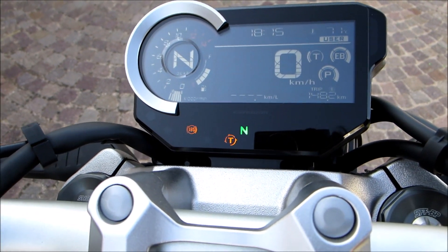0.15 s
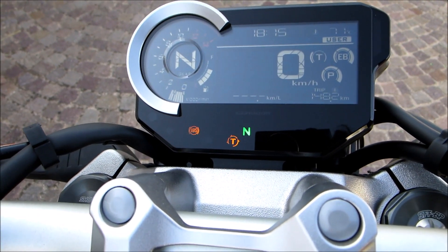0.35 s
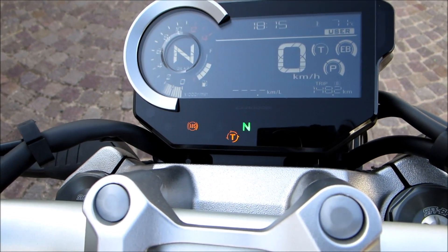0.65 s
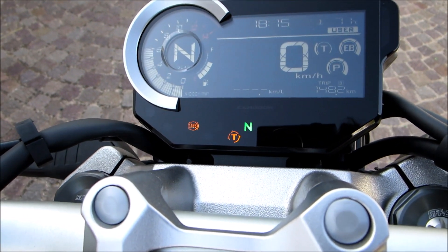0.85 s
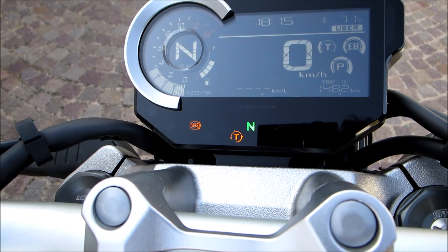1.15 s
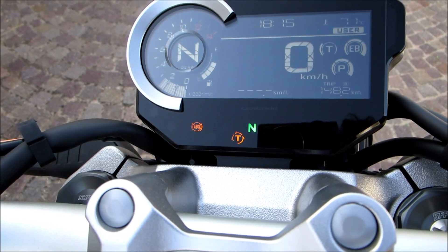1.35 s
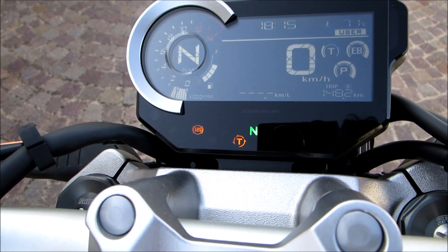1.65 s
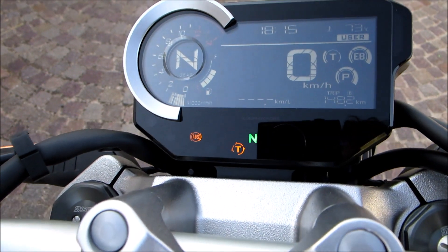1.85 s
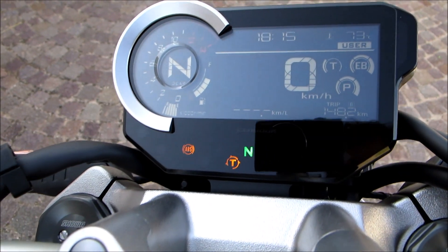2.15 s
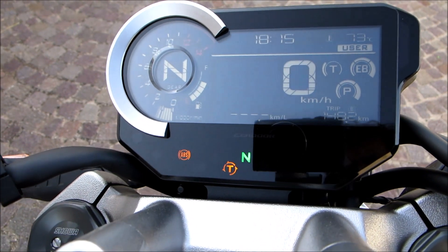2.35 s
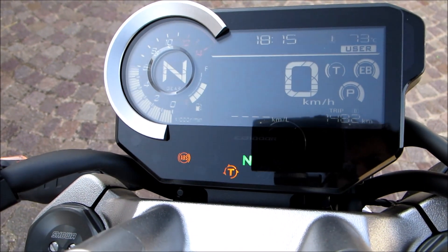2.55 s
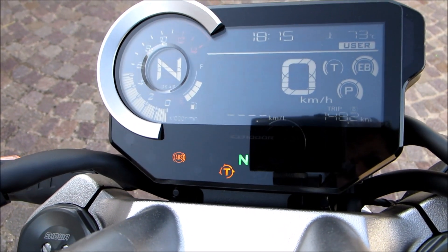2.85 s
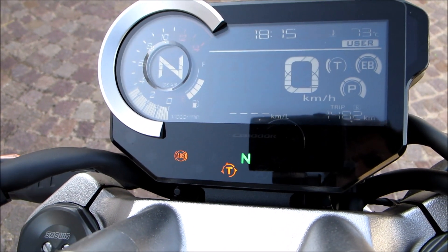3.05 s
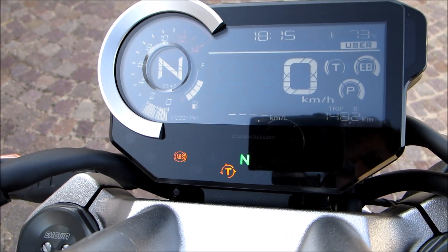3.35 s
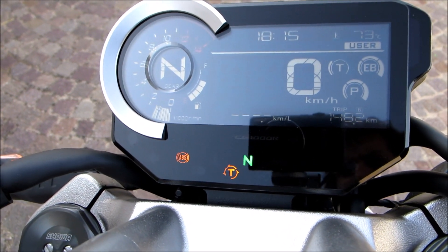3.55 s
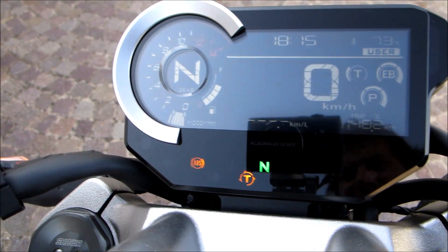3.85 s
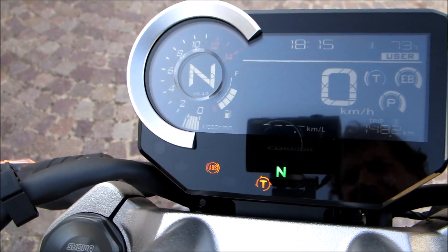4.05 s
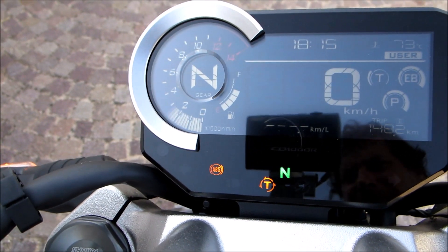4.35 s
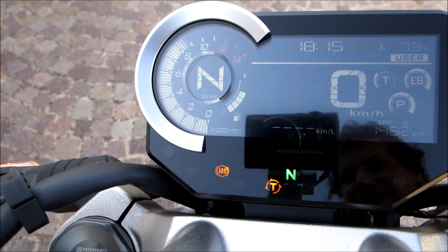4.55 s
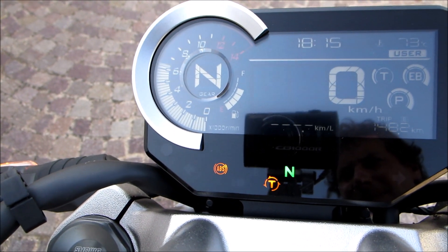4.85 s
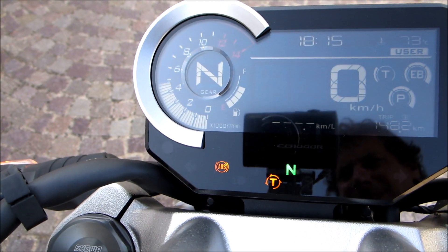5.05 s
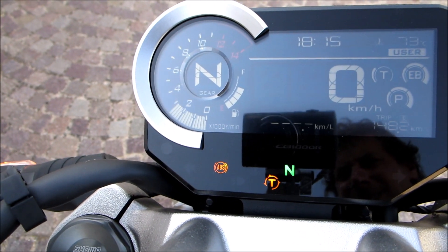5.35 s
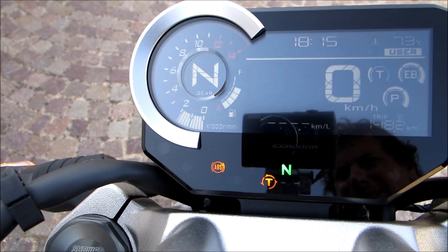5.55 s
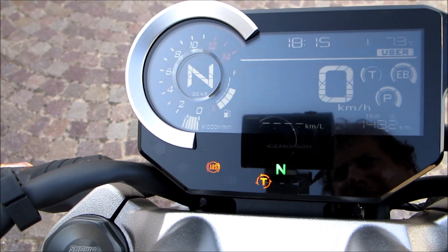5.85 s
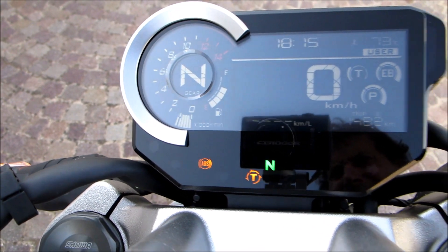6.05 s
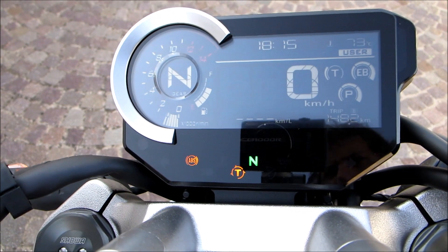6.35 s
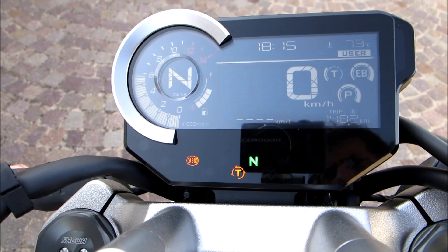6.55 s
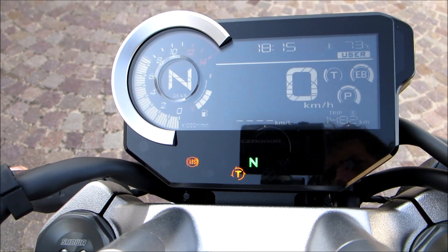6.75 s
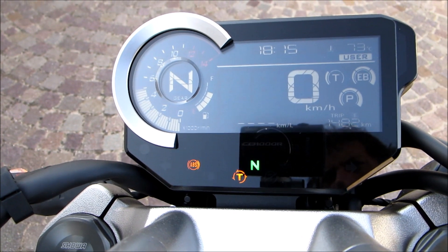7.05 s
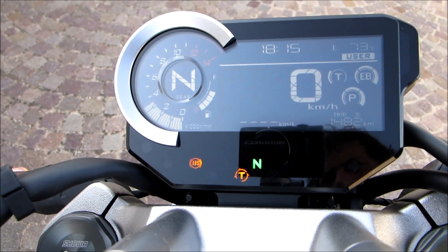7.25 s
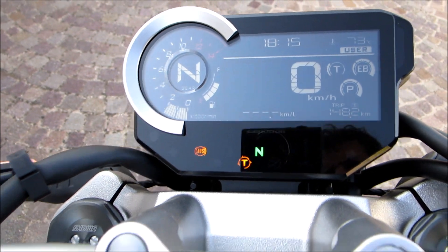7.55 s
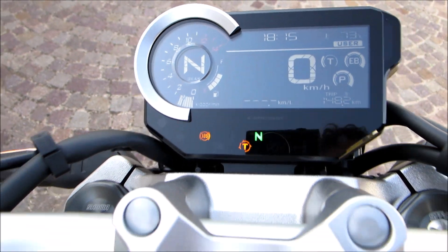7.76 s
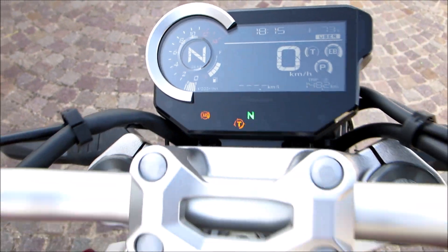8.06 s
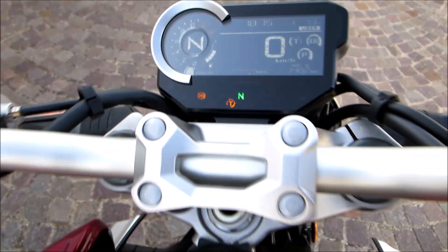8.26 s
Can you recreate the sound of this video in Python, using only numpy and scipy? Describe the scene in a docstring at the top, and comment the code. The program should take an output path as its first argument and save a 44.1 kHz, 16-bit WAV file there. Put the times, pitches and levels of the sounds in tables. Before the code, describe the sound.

Close motorcycle engine at idle outdoors, four throttle blips that snarl upward quickly, then slide down as a clean tone into lumpy idle.

```python
"""A four-cylinder motorcycle idles on open paving, heard from above the handlebar.
Exhaust pulses first ring the silencer, with a few weak firings. Then come four blips: each time the revs climb
and the exhaust barks, and on the way down the fuel is cut and a clean falling tone, the engine's pumping, sings
over valve and chain hiss. After each fall the firing catches unevenly and the engine settles back to idle.
Pulses, noise and sine waves follow one running count of firings; single cracks and thumps are added on top."""
import sys
import numpy as np
from scipy import signal
from scipy.io import wavfile
from scipy.ndimage import uniform_filter1d

SR = 44100
rng = np.random.default_rng(int(sys.argv[2]) if len(sys.argv) > 2 else 0)


def log_audio(samples):
    """Write samples as a 16-bit WAV file to the path given in sys.argv[1]."""
    # one column per channel
    frames = np.atleast_2d(samples).T
    # limit to full scale, then quantise
    limited = np.clip(frames, -1, 1)
    pcm = np.round(limited * 32767).astype(np.int16)
    wavfile.write(sys.argv[1], SR, pcm)


N = 369999  # samples

# One row a blip, when the revs climb and fall through PASSING_HZ: climb_s, fall_s
BLIPS = [(0.689, 1.276), (2.458, 3.16), (4.375, 5.321), (6.473, 7.326)]
# Brief dips from weak firings: time_s, depth_db, width_s
WEAK_FIRINGS = [(0.244, 14, 0.015), (4.01, 5, 0.013), (4.092, 10, 0.022), (4.139, 12, 0.018),
                (5.618, 0, 0.016), (5.784, 18, 0.027), (6.081, 10, 0.018), (7.726, 5.5, 0.039),
                (8.067, 10, 0.017), (8.19, 12, 0.028)]
# Hard firings that crack: start_s, level_db
CRACKS = [(0.149, -11), (0.594, -22), (0.618, -7.5), (0.649, -26), (0.672, -17), (2.417, 1), (4.236, -35),
          (5.798, -21), (6.451, -23), (6.489, -1)]
# Unburnt charge lighting in the silencer: start_s, level_db
THUMPS = [(2.55, -24), (4.635, -10), (6.705, -11)]
# Overall level, which sags and partly recovers: time_s, level_db
LEVEL = [(0, 1), (.2, -0.1), (.55, -1.7), (.85, -8.5), (1.2, -7), (1.6, -9), (2.3, -6), (2.65, -9.5),
         (3.1, -9.5), (3.6, -11), (4.2, -7.5), (4.6, -7), (5.2, -11.5), (5.7, -12), (6.3, -10), (6.7, -7),
         (7.25, -11.5), (7.8, -12), (8.39, -10.5)]
# Levels at a closed throttle, before LEVEL: firing_hz, tone_db, bark_db, hiss_db
COASTING = [(36.7, -38, -23.5, -37.5), (46, -31, -22.5, -34.5), (58, -22.5, -21, -35),
            (71.4, -13.5, -18.5, -34.5), (90, -6, -15, -30.5), (106, -1.5, -14.5, -27.5),
            (127.5, -1, -12, -25), (148, -8.5, -13, -24), (158, -13, -11.5, -21.5),
            (180, -11, -11.5, -23.5), (203, -6, -12.5, -21.5), (208, -6, -12.5, -22.5), (264, -8, -11, -17),
            (302, -10, -12, -18)]
# What full load adds: firing_hz, tone_db, bark_db, hiss_db, boom_db
LOADED = [(47, .1, 2, 1.5, 4), (66, 4.5, 8, 8.5, 5), (82, -1, 7.5, 5, 22), (110, 1.5, 6.5, 1.5, 6),
          (135, -2, 3.5, -4.5, 8), (161, -15, 1, -3, 18), (193, -0.5, 4.5, 1.7, 6), (230, 2.5, 2, -3, 20),
          (263, 1, -0.2, -4.2, 6)]
# Pulse strength of each cylinder in firing order: level_db
CYLINDERS_DB = [0., -1.5, .8, -2.]
# Colour of the bark at idle: pitch_hz, gain_db
BARK_IDLE = [(120, -17.5), (210, -4.5), (290, -6), (440, -1.5), (560, -9.5), (640, -2.5), (800, -6),
             (1000, -3), (1280, -14), (1490, -14), (2500, -29.5), (3200, -46), (5200, -45), (8800, -100)]
# Colour of the bark with the throttle open: pitch_hz, gain_db
BARK_OPEN = [(120, -22), (200, -2), (347, -2.5), (446, -11), (512, -3), (727, -3.5), (794, 6), (911, -1.5),
             (1290, -17.5), (1680, -21), (4000, -25), (5200, -61), (8800, -120)]
# Colour of the bark with the throttle shut: pitch_hz, gain_db
BARK_SHUT = [(190, -46.5), (330, -5.5), (411, -11.5), (545, -5), (637, -16.5), (700, 2.5), (908, 5.5),
             (1340, -3), (1700, -8.5), (3250, -34), (4000, -14.5), (5200, -68), (8800, -120)]
# Frame and pipe resonances, against the bark: pitch_hz, width_hz (of one filter pass), level_db
RINGS = [(224.2, 35, -17), (896, 19, -13.5), (1694, 86, -15), (2567, 390, -22)]
# Bark that differs between the microphones, against the shared bark: pitch_hz, gain_db
SPREAD = [(200, -43), (380, -15.5), (700, -18), (1290, -14), (2380, -20), (4400, -1)]
# Colour of the silencer's boom: pitch_hz, gain_db
SILENCER = [(20, -54), (37, -16), (74, -7), (100, 11.5), (112, 7.5), (128, 5.5), (150, -10.5), (185, -18),
            (230, -39), (320, -21), (600, -51), (2500, -100)]
# Colour the silencer gives the slow orders while revving: pitch_hz, gain_db
SILENCER_REVVING = [(30, -26), (70, -21), (105, 6), (130, -2.5), (160, -16), (230, -7)]
# Slow beats from unequal cylinders, before SILENCER_REVVING: multiple (of the firing rate), level_db
SLOW_ORDERS = [(.25, -35), (.5, -29.5), (.75, -35.5)]
# Rasp tones, before OUTLET and the rise with revs: multiple (of the firing rate), level_db
RASP_ORDERS = [(1.5, -15), (2, -3.5), (2.5, -12.5), (3, -5.5), (3.5, -10.5), (4, -7.5), (4.5, -10),
               (5, -9.5), (5.5, -10), (6, -19.5), (6.5, -10.5), (7, -10.5), (7.5, -11), (8, -19.5),
               (9, -8.5), (10, -26)]
# Colour the outlet gives the rasp: pitch_hz, gain_db
OUTLET = [(100, -5), (150, 9), (200, -7), (280, 0), (340, -4), (390, -6.5), (440, -6.5), (490, -7),
          (550, 1), (620, -2), (710, -0.5), (800, -6.5), (900, 0), (1050, 0), (1300, -10.5), (1700, -5.5),
          (2600, -50)]
# How each rasp tone wavers: level_db, rate_hz, phase_turns (grows with the root of the multiple)
RASP_WAVER = 4.2, 16., .04
# Rasp of the coasting engine, against the bark: pitch_hz, width_hz (of one filter pass), level_db
SIZZLE = 2650, 1100, -18.5
# Colour of valve and chain hiss: pitch_hz, gain_db
HISS = [(1120, -24), (1900, 0.5), (2410, -2), (3250, -8.5), (5700, -10.5), (13000, -23.5), (14600, -25.5),
        (15500, -34)]
# Extra colour of the hiss that both microphones hear alike: pitch_hz, gain_db
SHARED_HISS = [(1500, 5.5), (2600, -7), (3600, -6), (5000, -11), (9000, -4.5), (14000, -1)]

# Speeds are in firings a second
IDLE_HZ, HUNT_HZ, HUNTS_PER_S = 36.9, 1.2, 2.5  # idle speed, how far it hunts and how quickly
PASSING_HZ = 100
CLIMB_PER_S = 6.9  # under throttle the revs grow exponentially
DRAG_PER_S, FRICTION_HZ = .685, 207.2  # coasting loses DRAG x (revs + FRICTION) each second
CREST, SETTLE = 7.2, 8.5  # sharpness of the turn at the top and of the landing at idle
THROTTLE_FROM_HZ = 35  # load adds nothing at or below this speed
MERGE_HZ, RELIGHT_HZ = 80.3, 70  # pulses merge into a tone above the first; fuel returns below the second
THROTTLE_EDGE_S = .1
BOOM_DB, BOOM_FADE_DB = -11, 25  # boom before LEVEL and load, and its drop while revving
OVERRUN_HUSH_DB = 3.5  # less turbulence without combustion
RASP_DB_PER_OCTAVE = 5.5
SCATTER_DB, KNOCK_DB = 1.5, -7.5  # chance in firing strength; header knock against the bark
LEFT_LAG, EDGE_HZ = 3, 15350  # extra samples to the left microphone; top of the sound band


def bark(train, turns, opened, shut):
    """Pulses and turbulent gas shake the pipe, whose colour follows the throttle."""
    # The gas noise is strongest just after each firing
    puff = (3.7 + np.exp(-(turns % 1) / 1.0)) * rng.standard_normal(N)
    swell = uniform_filter1d(train, 600, origin=299)  # a strong firing blows a strong puff
    gas = evened(puff * (swell + 2.8 * swell.mean()), 0.12)
    # Baffles smear each pulse
    echoes = rng.standard_normal(900) * gain_of(-60 * np.arange(900) / SR / 0.026)
    smeared = evened(signal.oaconvolve(train, echoes)[:N], 0.05)
    rough = np.clip(.75 - 0.096 * opened - 0.034 * shut, 0, 1)
    drive = (1 - rough) * smeared + rough * gas

    out = np.zeros(N)
    shares = (np.clip(1 - opened - shut, 0, 1), opened, shut)
    for share, points in zip(shares, (BARK_IDLE, BARK_OPEN, BARK_SHUT)):
        out += np.sqrt(share) * evened(colour(drive, points), 0.19)
    for hz, width, db in RINGS:
        out += gain_of(db) * evened(ring(drive, hz, width), 0.21)
    return out


def pulses(turns, scatter_db, jitter_s):
    """Each firing makes one click, sized by its cylinder and by chance, slightly off the beat."""
    at = np.flatnonzero(np.diff(np.floor(turns)))
    luck = rng.standard_normal((N // 100, 2))[:len(at)]
    size_db = np.take(CYLINDERS_DB, np.arange(len(at)) % 4) + scatter_db[at] * luck[:, 0]
    late = (jitter_s[at] * SR * luck[:, 1]).astype(int)
    train = np.zeros(N)
    train[np.clip(at + late, 0, N - 1)] = gain_of(size_db)
    return train


def silencer_boom(train, level_db):
    """The exhaust pulses ring the silencer's low resonances."""
    return gain_of(level_db) * evened(colour(train, SILENCER), 0.098)


def firing_tone(turns, hz, level_db):
    """A clean sine wave at the firing rate, fading in above idle."""
    fade_in = np.clip((hz - 42) / 15, 0, 1)
    return gain_of(level_db) * fade_in * np.sqrt(2) * np.sin(2 * np.pi * turns)


def orders(table, outlet, hz, turns, waver_db, waver_hz, slip):
    """Multiples of the firing rate waver in level and phase and sweep through the outlet's colour."""
    out = np.zeros(N)
    for k, db in table:
        level = gain_of(db + read(outlet, k * hz) + waver_db * wander(waver_hz))
        phase = k * turns + rng.random() + slip * np.sqrt(k) * wander(waver_hz)
        out += level * np.sqrt(2) * np.sin(2 * np.pi * phase)
    return out


def header_knock(train, level_db):
    """Each firing rings the metal exhaust header."""
    return gain_of(level_db + 1.7 * wander(12.)) * evened(ring(train, 1005.0, 170.0), 0.069)


def coasting_sizzle(rush, bark_db):
    """A high resonance picks a rasp out of the exhaust rush."""
    hz, width, db = SIZZLE
    return gain_of(bark_db + db) * evened(ring(rush, hz, width), 0.26)


def blows(events, hz, t60, noisy, rise_s):
    """Single hard blows ring the pipe, falling 60 dB in t60 seconds."""
    t, out = np.arange(3000) / SR, np.zeros(N + 3000)
    for start_s, db in events:
        # Smoothing twice leaves mainly the lower noise
        noise = uniform_filter1d(uniform_filter1d(rng.standard_normal(3000), 12), size=6)
        knock = np.sin(2 * np.pi * hz * t) + noisy * 1.4 * noise
        envelope = gain_of(db - 60 * t / t60) * (1 - np.exp(-t / rise_s))
        out[round(start_s * SR):][:3000] += envelope * knock
    return out[:N]


def hiss(turns, flicker):
    """Valve ticks and chain noise throb twice a firing and flicker in level."""
    throb = 1 + 0.55 * np.exp(-((2 * turns) % 1) / 0.12)
    ticks = (rng.random(N) < 600 / SR) * rng.standard_normal(N)  # about 600 a second
    noise = throb * rng.standard_normal(N) + 2.95 * ticks
    return evened(colour(noise, HISS, size=1024), 0.098) * gain_of(1.1 * flicker)


def revs(t):
    """Each blip climbs until it meets its coast-down; gives speed, blip speed and share of load."""
    up, down = np.transpose(BLIPS)[:, :, None]
    climb = PASSING_HZ * np.exp(np.clip(CLIMB_PER_S * (t - up), -9, 9))
    coast = (PASSING_HZ + FRICTION_HZ) * np.exp(-DRAG_PER_S * (t - down)) - FRICTION_HZ
    coast = np.maximum(coast, 1)
    spin = (climb ** -CREST + coast ** -CREST) ** (-1 / CREST)  # a soft minimum
    now = spin.argmax(axis=0), np.arange(N)  # the fastest blip counts
    load = (spin[now] / climb[now]) ** CREST
    idle = IDLE_HZ + HUNT_HZ * wander(HUNTS_PER_S)
    hz = (spin[now] ** SETTLE + idle ** SETTLE) ** (1 / SETTLE)  # a soft maximum
    return hz, spin[now], load


def levels(t, hz, spin, load):
    """Tone, bark, hiss and boom levels in dB follow speed, load and the overall level."""
    coast_hz, *coasting = np.transpose(COASTING)
    load_hz, *loaded = np.transpose([(THROTTLE_FROM_HZ, 0, 0, 0, 0)] + LOADED)
    base = [np.interp(hz, coast_hz, column) for column in coasting] + [BOOM_DB]
    overall = np.interp(t, *np.transpose(LEVEL))
    return [overall + b + load * np.interp(spin, load_hz, extra) for b, extra in zip(base, loaded)]


def wander(rate_hz):
    """Slow random drift, its running strength (rms) held at one."""
    lowpass = signal.butter(2, rate_hz, fs=SR, output="sos")
    return evened(signal.sosfilt(lowpass, rng.standard_normal(N)), 2.845)


def ring(x, hz, width):
    """A resonance applied twice, so that its skirts are steep."""
    b, a = signal.iirpeak(hz, hz / width, SR)
    return signal.lfilter(b, a, signal.lfilter(b, a, x))


def colour(x, points, size=8192):
    """Shapes the spectrum without ringing ahead of a sound: the phase follows from the log gain."""
    gain_db = np.maximum(read(points, abs(np.fft.fftfreq(size, 1 / SR))), -100)
    log_gain = np.log(gain_of(gain_db))
    taps = np.fft.ifft(np.exp(np.conj(signal.hilbert(log_gain)))).real[:size // 2]
    return signal.oaconvolve(x, taps)[:N]


def read(points, hz):
    """Reads a spectrum on a log-frequency axis."""
    f, value = np.transpose(points)
    return np.interp(np.log(hz + 1), np.log(f + 1), value)


def evened(x, span_s):
    """Holds the running strength (rms) at one."""
    span = round(span_s * SR)
    power = uniform_filter1d(uniform_filter1d(x ** 2, span), span)
    return x / np.sqrt(abs(power) + 1e-12)


def within(t, starts, ends, edge_s):
    """One inside the spans, zero outside, with soft edges."""
    inside = sum((t > a) & (t < b) for a, b in zip(starts, ends)) * 1.
    return uniform_filter1d(inside, round(edge_s * SR))


def gain_of(db):
    """Turns decibels into gain."""
    return 10 ** (np.asarray(db) / 20)


def scene():
    """Mixes the engine for two microphones: the left is a little farther, and turbulence differs."""
    t = np.arange(N) / SR
    hz, spin, load = revs(t)
    tone_db, bark_db, hiss_db, boom_db = levels(t, hz, spin, load)
    turns = np.cumsum(hz) / SR - 1 / 100  # running count of firings

    # Throttle states, each between zero and one
    fast = spin > MERGE_HZ
    rise = t[1:][np.diff(1 * fast) > 0]
    peak = t[1:][np.diff(1 * (fast & (load < .5))) > 0]
    back = t[1:][np.diff(1 * (spin > RELIGHT_HZ)) < 0]
    revving = within(t, rise, back, 0.034)
    shut = within(t, peak, back, 0.093)
    opened = within(t, rise - .07, peak - .02, THROTTLE_EDGE_S)
    catching = within(t, back, back + .3, 0.03)  # uneven burning as the fuel returns

    scatter_db = SCATTER_DB * (1 - 0.6 * shut) + 0.39 * catching
    jitter_s = .0006 + 0.00119 * catching - 0.00051 * revving
    train = pulses(turns, scatter_db, jitter_s)
    dip_db = sum(depth * np.exp(-((t - at) / width) ** 2 * 2) for at, depth, width in WEAK_FIRINGS)

    # Above idle the pulses merge into the firing tone
    boom = silencer_boom(train, boom_db - dip_db - BOOM_FADE_DB * revving)
    tone = firing_tone(turns, hz, tone_db)
    slow = revving * orders(SLOW_ORDERS, SILENCER_REVVING, hz, turns, 3.0, 3.1, 0.024)
    bass = boom + tone + slow

    rush_gain = gain_of(bark_db - 0.31 * dip_db - OVERRUN_HUSH_DB * shut)
    rush = rush_gain * bark(train, turns, opened, shut)
    unshared = rush_gain * bark(train, turns, opened, shut)
    rasp_db = bark_db - 1.0 + RASP_DB_PER_OCTAVE * np.log2(hz / 200)  # clearer at high revs
    rasp = revving * gain_of(rasp_db) * orders(RASP_ORDERS, OUTLET, hz, turns, *RASP_WAVER)
    knock = (1 - revving) * header_knock(train, bark_db - dip_db + KNOCK_DB)
    sizzle = shut * coasting_sizzle(rush, bark_db)
    cracks = blows(CRACKS, 875.0, 0.022, 0.83, 0.00032)
    thumps = blows(THUMPS, 120.0, 0.084, .0, 0.011)

    flicker = wander(13.0)  # common to all three hisses
    left, right, shared = (gain_of(hiss_db) * hiss(turns, flicker + 0.55 * wander(22.0)) for _ in range(3))
    shared = colour(shared, SHARED_HISS, size=256)

    mid = rasp + rush + knock + sizzle + shared + cracks + thumps
    side = colour(unshared, SPREAD)
    left_ear = np.roll(mid, LEFT_LAG) + side + left + np.roll(bass, 1)
    right_ear = mid - side + right + bass
    return np.array([left_ear, right_ear]) * gain_of([[.1], [-.1]])  # left slightly louder


def record(dry):
    """Loud peaks are softly rounded, then the highest treble is cut off."""
    rounded = np.tanh(dry * 0.87) / 0.98
    lowpass = signal.firwin(1023, EDGE_HZ, window=("kaiser", 12), fs=SR)
    return signal.oaconvolve(rounded, lowpass[None], "same")


dry = scene()
out = record(dry)
log_audio(out)
```